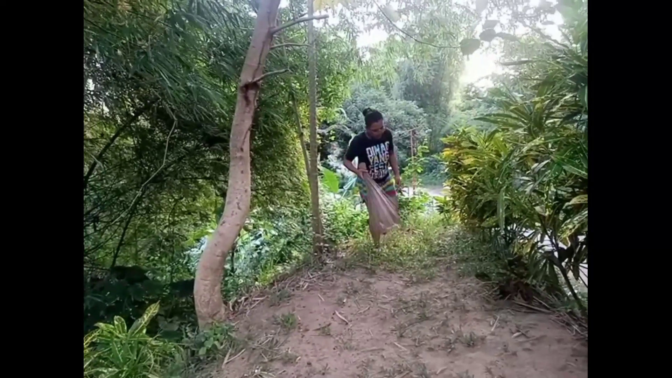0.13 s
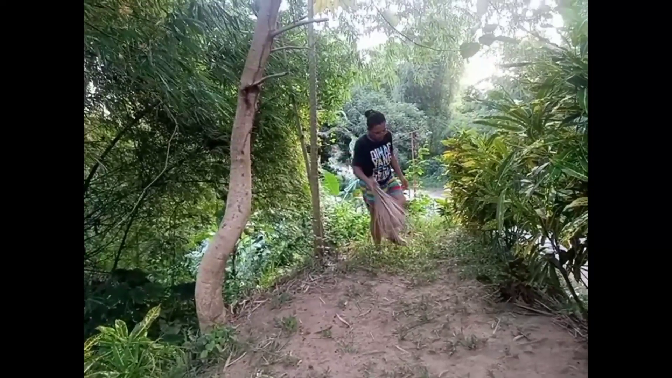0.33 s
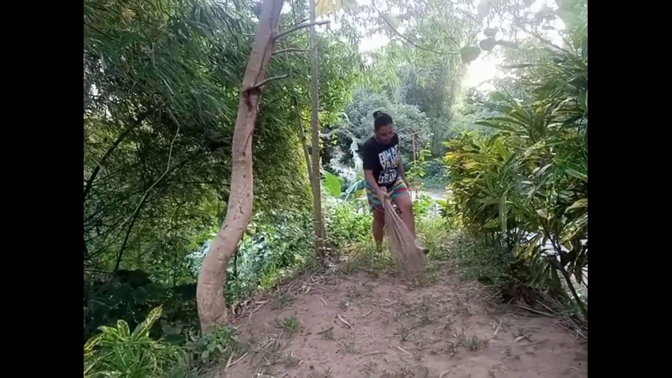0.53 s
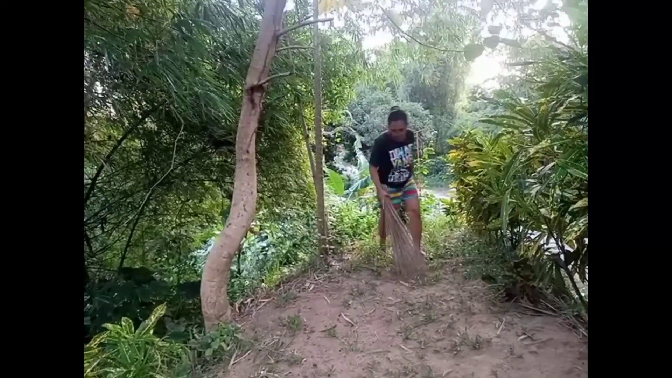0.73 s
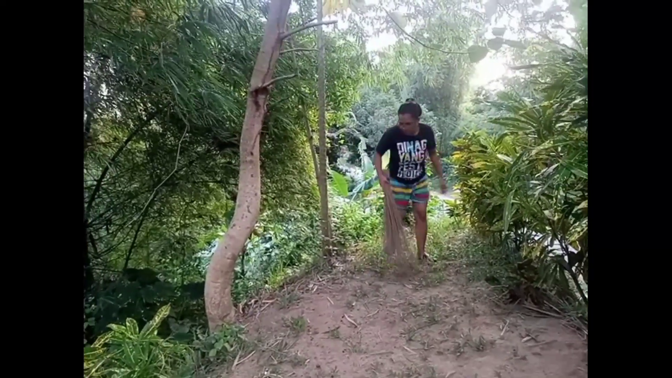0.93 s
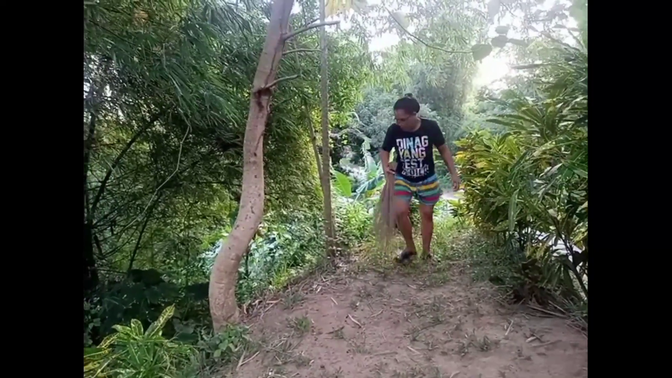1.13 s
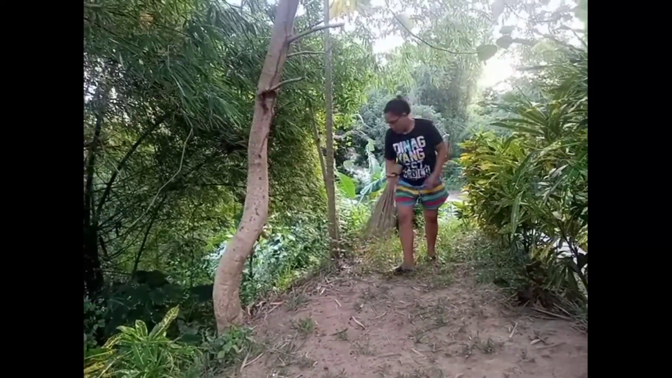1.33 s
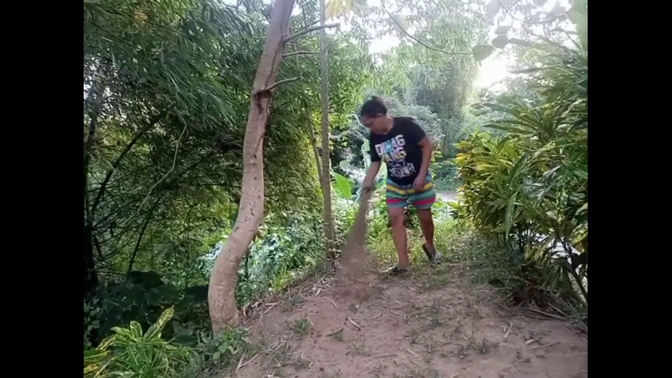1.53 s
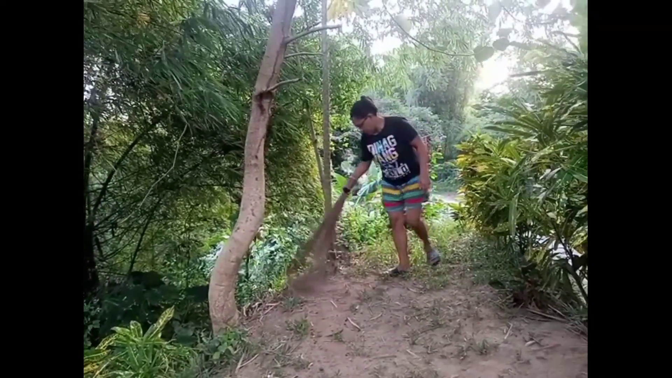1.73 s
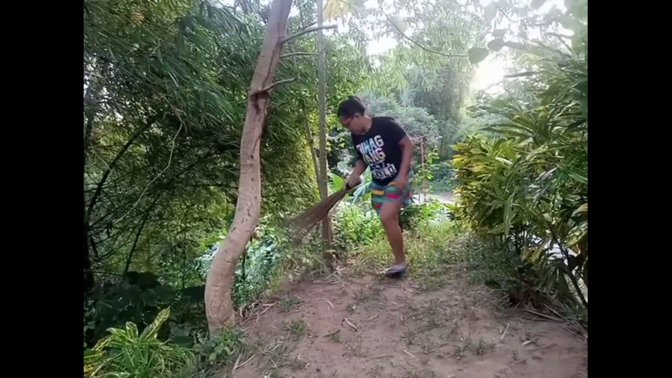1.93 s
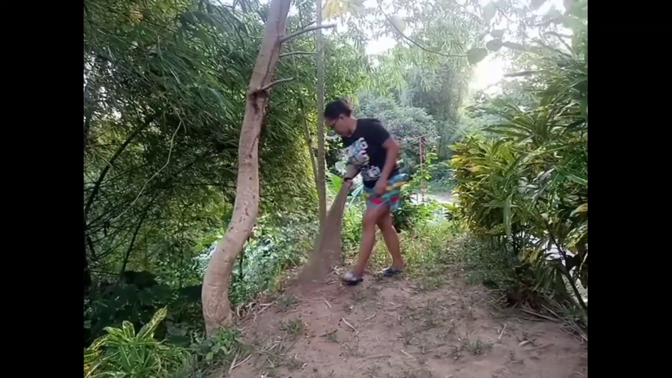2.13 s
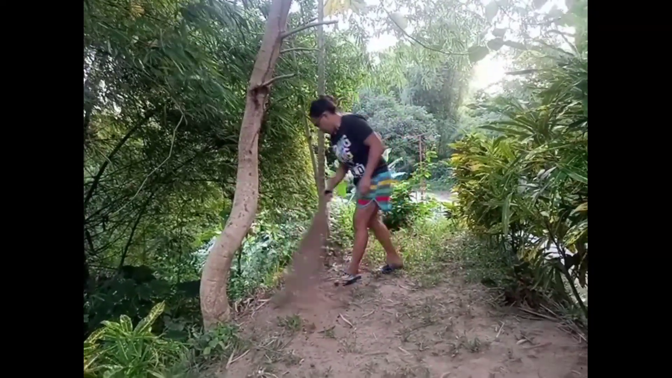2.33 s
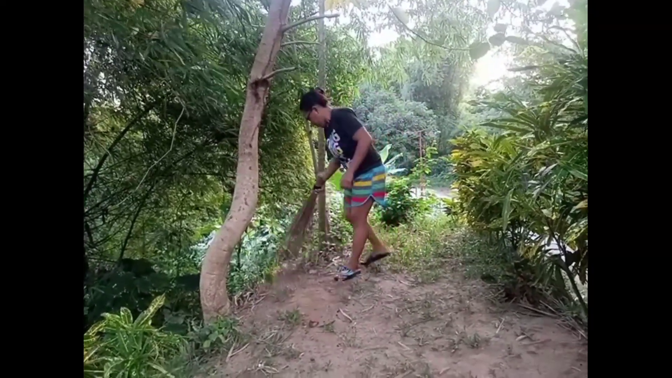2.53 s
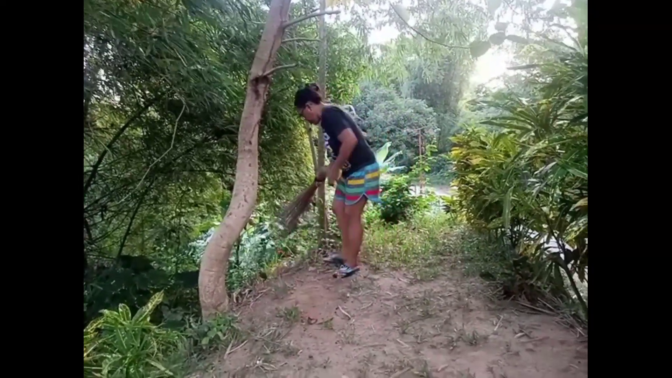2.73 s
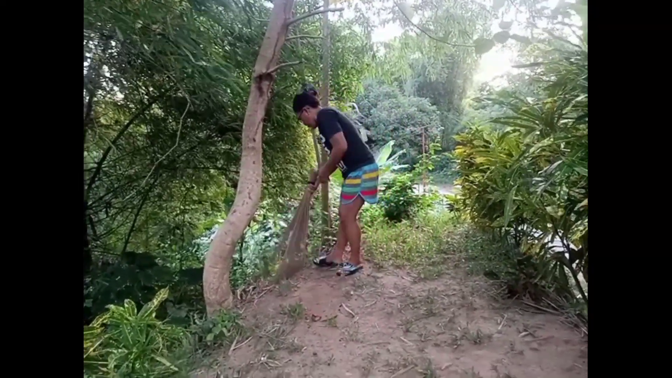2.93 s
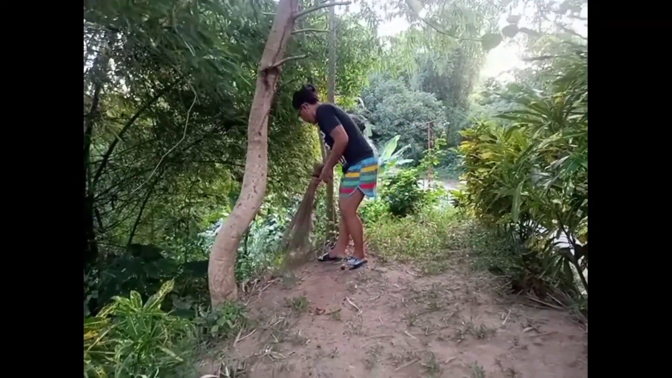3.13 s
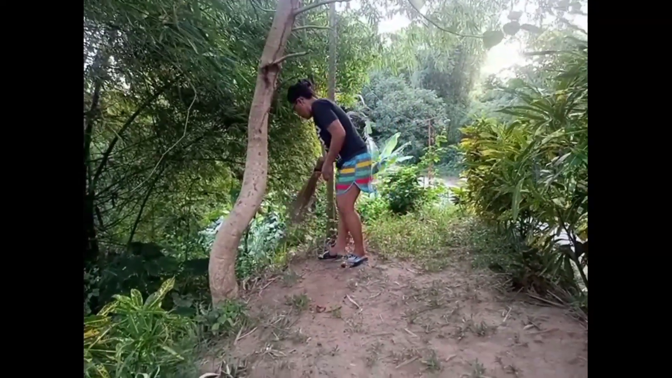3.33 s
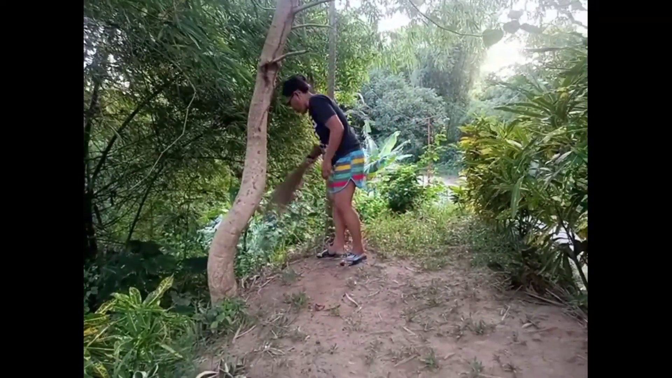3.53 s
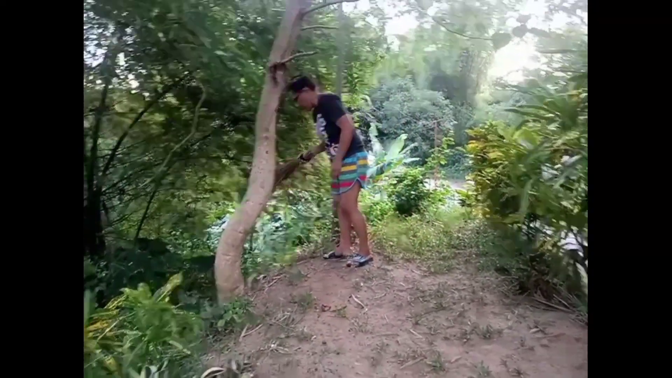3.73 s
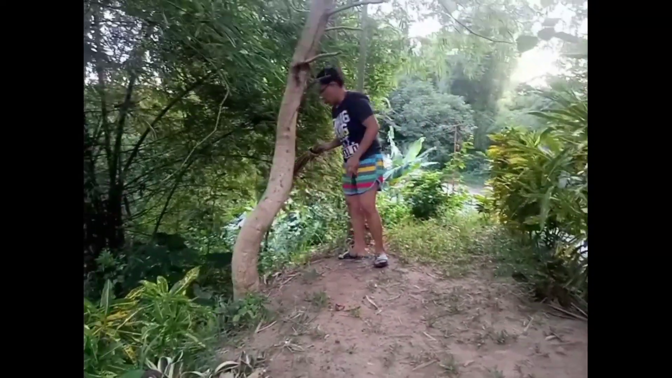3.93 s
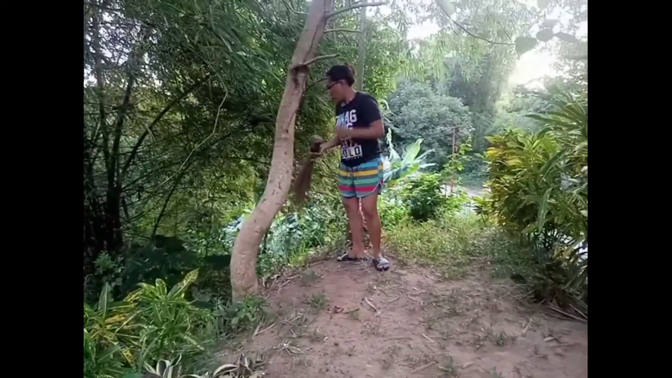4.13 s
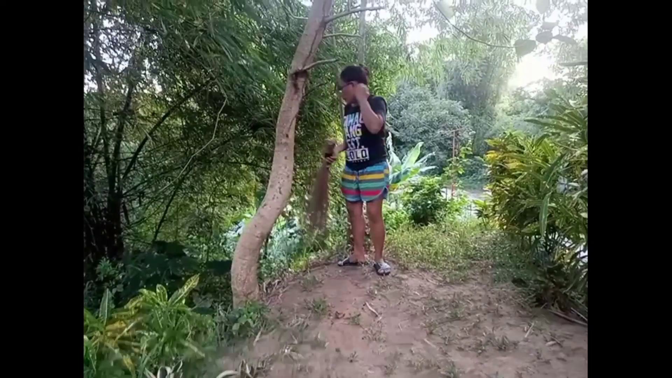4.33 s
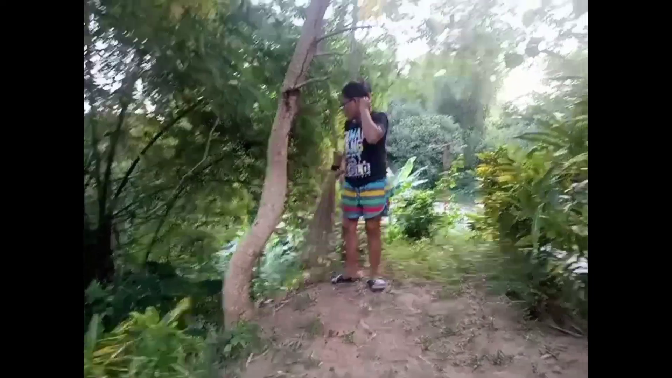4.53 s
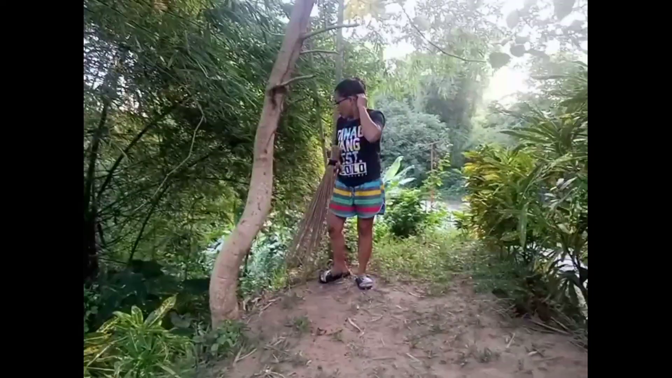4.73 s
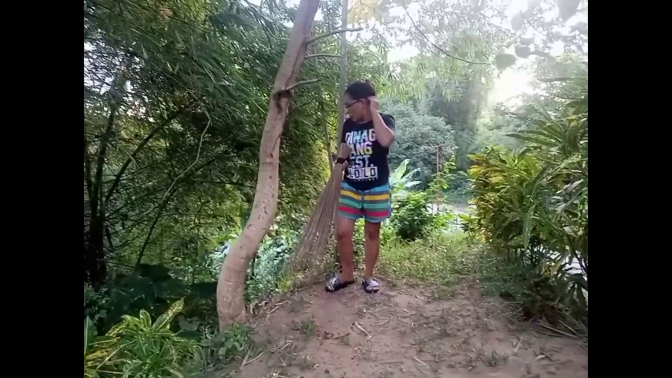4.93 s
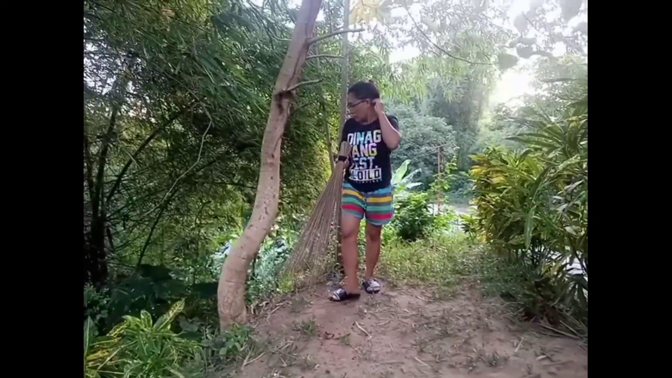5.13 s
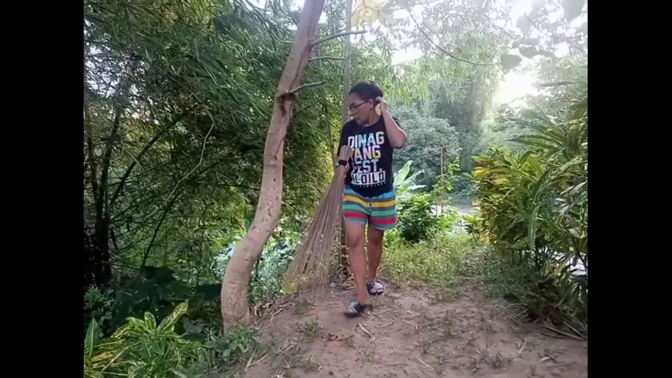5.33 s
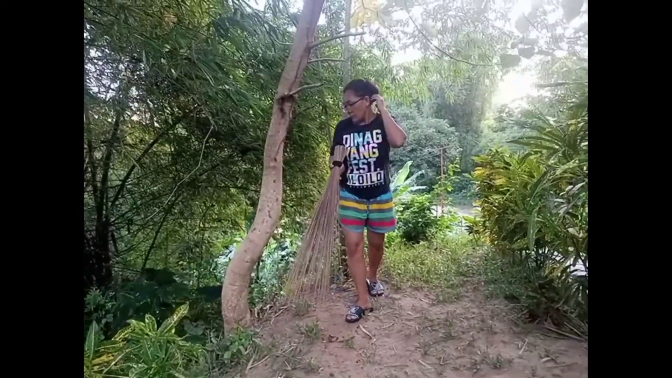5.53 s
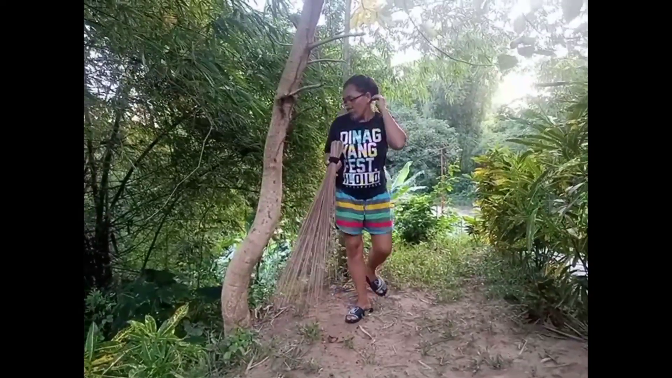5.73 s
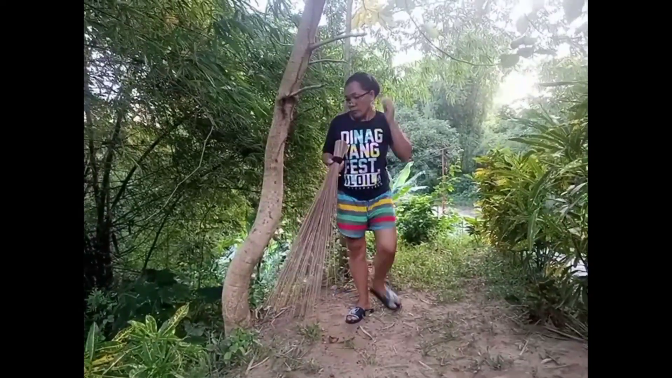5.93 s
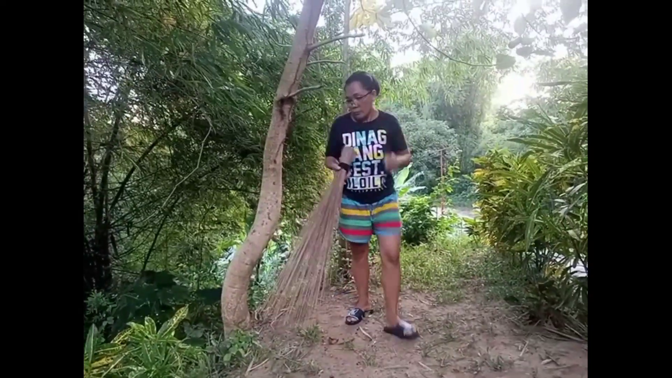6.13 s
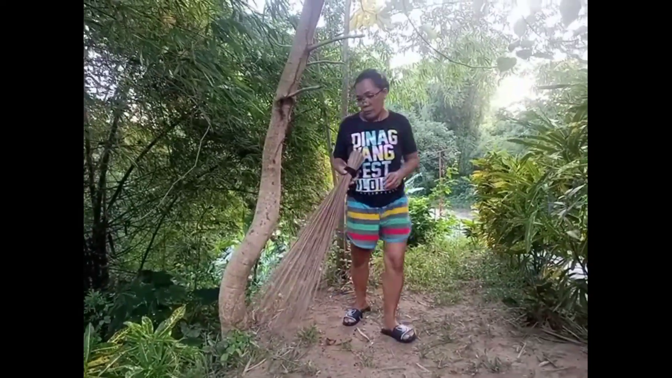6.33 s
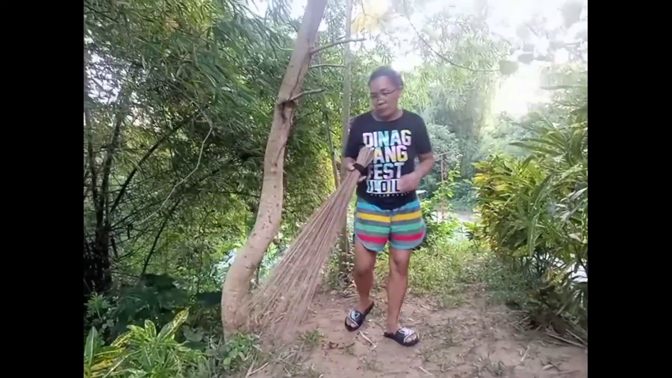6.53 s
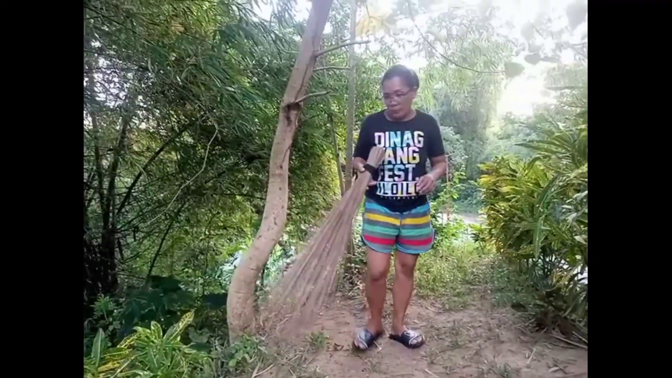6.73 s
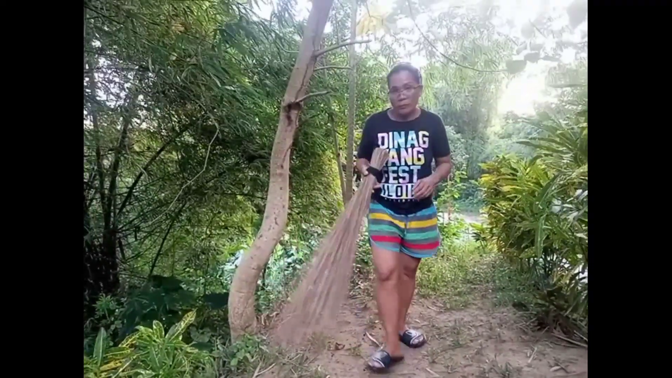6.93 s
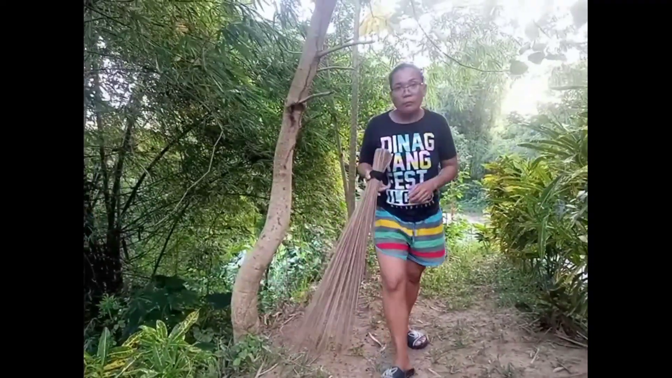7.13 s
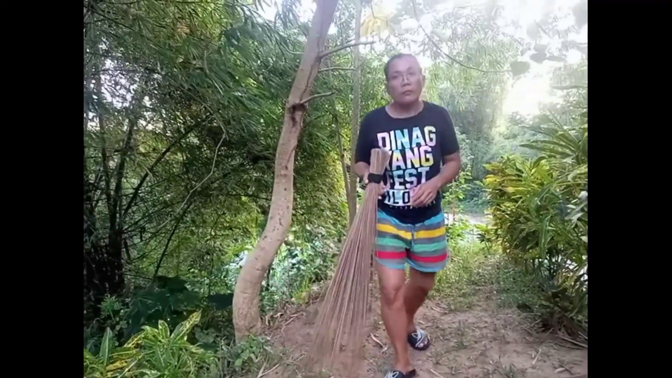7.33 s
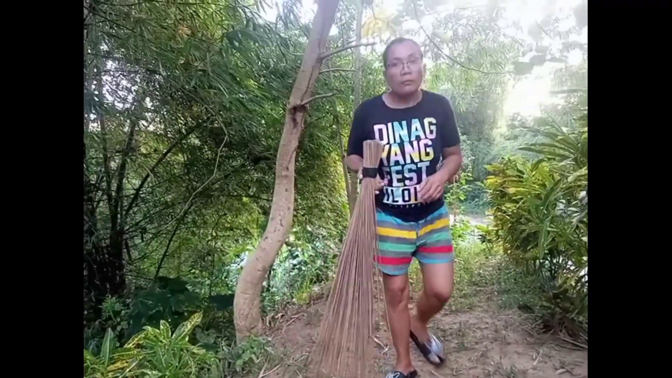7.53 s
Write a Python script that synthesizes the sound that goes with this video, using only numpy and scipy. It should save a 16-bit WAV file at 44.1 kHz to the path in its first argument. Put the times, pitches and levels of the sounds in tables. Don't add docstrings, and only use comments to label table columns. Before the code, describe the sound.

Scratchy broom strokes drive grit and twigs along packed earth, with a heel thud between, then faint leafy dragging amid crickets and distant rumble.

```python
import sys
import numpy as np
from scipy import signal
from scipy.fft import rfft, irfft, next_fast_len
from scipy.io import wavfile
from scipy.ndimage import uniform_filter1d

SR = 44100
rng = np.random.default_rng(int(sys.argv[2]) if len(sys.argv) > 2 else 0)


def rack_gain(trim_db):
    fader = np.asarray(trim_db, float)
    return 10 ** (fader / 20)


def int16_out(signal):
    q = np.round(np.clip(np.atleast_2d(signal).T, -1, 1) * 32767)
    wavfile.write(sys.argv[1], SR, q.astype(np.int16))


N = 338511

# time in seconds, drone level in dB.
ENGINE_DRONE = [(0, -39), (.9, -38.5), (1.55, -33.5), (2.1, -36), (2.7, -42), (3.1, -39), (3.8, -36),
                (4.5, -33), (5.2, -34.5), (5.9, -37), (6.8, -40), (7.68, -36.5)]
# time in seconds, firing rate in Hz.
ENGINE_FIRING = [(0, 41.08), (1, 41), (1.8, 40.46), (2.3, 40.25), (3.5, 40.06), (4.1, 39.04), (4.5, 39.1),
                 (4.9, 40.64), (5.3, 41.15), (5.9, 41.69), (7.68, 41.5)]
# multiple, level in dB.
ENGINE_ORDERS = [(2, -14.5), (3, -9), (4, -13), (5, -4), (6, 2.5), (7, 2), (8, -8), (9, -13), (10, -14),
                 (11, -14), (12, -20)]
# frequency in Hz, density in dB per Hz.
RUMBLE_COLOUR = [(15, -47), (25, -1), (27, -21), (32, -20.5), (128, 12), (281, 3.5), (348, -4), (454, -10),
                 (539, -18), (600, -47), (780, -76), (1320, -120)]
# time in seconds, level in dB.
TYRE_WASH = [(0, -55.5), (1, -48.5), (1.6, -49), (2.7, -52), (3.1, -60.5), (4.5, -53.5), (6.7, -60),
             (7.1, -45.5), (7.68, -53.5)]
# time in seconds, length in seconds, deep rumble in dB.
WIND_BUFFETS = [
    (1.15, 0.26, -45.5),
    (2.115, 0.071, -38),
    (2.443, 0.14, -48.5),
    (3.594, 0.061, -45),
    (4.564, 0.041, -42),
    (5.296, 0.047, -41),
    (5.708, 0.24, -46),
    (6.395, 0.47, -46.5),
    (7.0, 0.23, -45),
    (7.55, 0.069, -45.5),
]
# frequency in Hz, density in dB per Hz.
GARDEN_COLOUR = [(290, -46), (500, -12), (716, -16), (1150, -15), (1570, -26.5), (2420, -8), (3180, -4.5),
                 (4820, -13.5), (5640, -0.5), (7200, -3), (8080, -20.5), (10500, -20), (12200, -24),
                 (14100, 8.5), (15400, -27)]
# time in seconds, level in dB.
CRICKET_SWELL = [(4.2, -33), (4.4, -40), (5.5, -34.5), (5.7, -35), (7.3, -31), (7.68, -36)]
# start in seconds, end in seconds, level in dB.
KATYDID_RASPS = [
    (0.294, 0.44, -45),
    (0.573, 0.72, -44),
    (5.55, 5.661, -43),
    (5.82, 5.995, -43),
    (6.15, 6.303, -41),
    (6.515, 6.64, -39),
]
# start in seconds, end in seconds, notes per second, bottom in Hz,
# level in dB.
BIRD_TRILLS = [(0.293, 0.43, 42, 5660, -33), (0.59, 0.708, 45, 5680, -28), (1.54, 1.624, 85, 6030, -31),
               (3.972, 4.06, 48, 5960, -30), (4.208, 4.275, 41, 5880, -30.5),
               (4.862, 4.922, 50, 6500, -28.5), (5.053, 5.152, 60, 6400, -28),
               (5.325, 5.435, 40, 5800, -30.5), (6.475, 6.612, 52, 5870, -29.5),
               (6.685, 6.788, 80, 6250, -29), (6.91, 7.036, 89, 6250, -30), (7.377, 7.443, 69, 6090, -42),
               (7.594, 7.682, 61, 6300, -37)]
# time in seconds, peak in dB, pitch in Hz, cycles rung.
HEEL_THUDS = [
    (2.105, -19, 213, 5.4),
    (2.121, -6.5, 255, 5),
    (2.135, -5.5, 287, 15),
    (2.15, -9, 248, 2.8),
    (7.519, -16, 186.7, 4.7),
    (7.538, -19, 186, 7.4),
    (7.553, -36, 300.6, 6.3),
    (7.563, -17, 187, 4.8),
]
# time in seconds, peak in dB, pitch in Hz, cycles rung.
PEBBLES = [(1.661, -31, 1290, 4.0), (1.676, -18, 1140, 4.0), (1.7, -28, 1360, 4.0), (1.712, -20, 972, 4.0),
           (1.721, -16, 1030, 4.0), (1.737, -28, 703, 4.0), (1.749, -31, 1120, 4.0),
           (1.785, -34, 1450, 4.0), (1.799, -35, 1120, 4.0), (1.815, -28, 1350, 4.0),
           (1.871, -32, 1080, 4.0), (1.893, -34, 1350, 4.0), (1.919, -32, 1100, 4.0),
           (1.939, -33, 1450, 4.0), (2.031, -36, 1130, 4.0), (2.195, -23, 840, 3.4),
           (2.213, -20, 1170, 4.0), (2.249, -19, 1170, 4.0), (2.473, -37, 1300, 4.0),
           (2.511, -34, 1470, 4.0), (2.572, -27, 1500, 4.0), (2.609, -31, 1440, 4.0),
           (2.642, -32, 816, 4.0), (2.66, -25, 856, 4.0), (2.68, -20, 1470, 4.0), (2.731, -17.5, 977, 4.0),
           (2.743, -17, 1080, 4.0), (2.872, -30, 1130, 4.4), (3.26, -35, 1430, 4.0), (3.299, -35, 937, 4.0),
           (3.329, -37, 842, 4.0)]
# time in seconds, peak in dB, pitch in Hz, cycles rung, crack in dB.
TWIGS = [(0.755, -38, 1740, 3.5, -20), (1.722, -24, 1700, 4, -19.5), (1.746, -24, 2200, 4, -20),
         (1.804, -23, 1900, 4, -20), (1.881, -20, 2300, 4, -20), (2.195, -23, 2100, 4, -22),
         (2.2365, -9.5, 1700, 9, -18), (2.228, -25, 1200, 4, -20), (2.243, -14, 1300, 4.4, -24),
         (2.303, -29, 1290, 1.9, -20), (2.5948, -8, 1750, 8.3, -16), (2.626, -19, 2300, 4, -20),
         (2.681, -15, 1900, 3.5, -22), (2.699, -24, 2000, 4, -20), (2.72, -18, 1700, 4, -20),
         (2.727, -14, 2050, 4, -20), (2.745, -13, 1900, 4, -20), (3.073, -18.5, 970, 24, -18),
         (3.0735, -15, 1400, 6.5, -18)]
# time in seconds, peak in dB, pitch in Hz, cycles rung, crack in dB.
TWIG_BREAK = [
    (2.3036, 4, 14300, 40, -12),
    (2.3035, -14, 5500, 3, -30),
    (2.3033, -13, 1400, 1.5, -40),
]
# time in seconds, peak in dB, pitch in Hz, cycles rung,
# crack in dB.
STALK_TICKS = [(2.2165, -5, 2930, 14, -17), (4.794, -18, 3910, 10, -17), (5.09, -25, 2300, 4, -20),
               (5.5, -19, 3100, 6, -18), (5.528, -25, 3300, 6, -18), (6.2514, -7, 3300, 4.6, -24),
               (6.2568, -14, 2300, 6, -26), (6.2597, -6, 3100, 4.8, -24), (6.2652, -21, 2300, 8, -26),
               (6.2664, -15, 3300, 5, -26), (6.268, -5, 2730, 10, -24), (6.2738, -11, 3800, 5.7, -20),
               (6.2756, -18, 3000, 4, -20), (7.1347, -18, 3620, 10, -20), (7.5547, -14, 3750, 9, -20)]
# time in seconds, peak in dB, pitch in Hz, cycles rung, crack in dB.
TIP_SNAPS = [
    (0.6564, -23, 13700, 12, -9),
    (0.6804, -11, 14000, 12, -15),
    (1.2804, -13, 14740, 12, -11),
    (1.2944, -19, 14800, 12, -8),
    (1.3254, -10, 14300, 12, -8),
    (5.7174, -11, 14300, 12, -17),
    (7.1365, -18, 14100, 11.4, -4),
    (7.203, -22, 14500, 12, -9),
    (7.212, -11.5, 14500, 12.4, -4),
]
# time in seconds, peak in dB, pitch in Hz.
STALK_PLUCKS = [(1.6916, -17, 3100), (1.716, -12, 2980), (1.7794, -13, 2940), (1.805, -14, 3000),
                (1.867, -13, 3110), (1.8841, -11, 3220), (2.1964, -13, 2970), (2.4478, -18, 3100),
                (2.5212, -14, 2900), (2.5451, -11, 3040), (2.5956, -10, 2870), (2.6054, -14, 3090),
                (2.616, -15, 3020), (2.6507, -9, 3110), (2.6704, -17, 2910), (2.6914, -20, 2970),
                (2.706, -14, 3120), (2.7132, -12, 2960), (2.731, -16, 2980), (2.7462, -12, 2960),
                (3.0766, -20, 3050), (3.1882, -10, 3300), (3.2051, -17, 2810), (3.2654, -1, 3110),
                (3.3047, -4, 3000), (3.325, -6, 2880)]
# bottom in Hz, top in Hz.
BROOM_ZONES = [(550, 2200), (2750, 5200), (7800, 10800), (12500, 15500)]
# frequency in Hz, density in dB per Hz.
BROOM_COLOUR = [(260, -57), (450, -46), (1160, -29), (1860, -19.5), (2300, -15), (2800, -10.5), (3310, -9),
                (4320, -9), (5470, -9.5), (5980, -7.5), (7140, -11), (9180, -7), (11300, -13), (13900, 2),
                (15400, -15.5)]
# start in seconds, end in seconds, pitch in Hz,
# level in dB over the scratch.
STALK_BUNDLES = [(0.51, 0.585, 4100, -6), (0.49, 0.62, 4520, -1.5), (.757, .78, 3770, -8),
                 (.72, .77, 4300, -6), (1.162, 1.208, 9400, 7.5), (1.165, 1.2, 8600, 2),
                 (1.9, 1.967, 3180, -13.5), (1.7, 1.9, 3630, -20), (1.72, 1.964, 4400, -11),
                 (1.6, 1.95, 5800, -23), (1.77, 1.78, 11000, -16), (2.443, 2.76, 3160, -14),
                 (2.45, 2.62, 4000, -30), (2.44, 2.69, 4640, -14), (2.5, 2.693, 6060, -17),
                 (2.44, 2.7, 10000, -11), (3.0, 3.1, 3110, -17.5), (3.198, 3.35, 3090, -8.5),
                 (3.4, 3.54, 3040, -13), (3.262, 3.38, 4700, -13), (3.2, 3.38, 4900, -19),
                 (3.38, 3.55, 4800, -28), (3.4, 3.55, 5790, -19), (3.903, 3.935, 5200, 2.5),
                 (4.49, 4.78, 3550, -9.5), (4.74, 4.82, 4920, -7), (4.52, 4.65, 4400, -9),
                 (5.04, 5.135, 3400, -6.5), (5.49, 5.6, 3600, -9), (2.05, 2.2, 4480, -12),
                 (0.716, 0.76, 9550, -1)]
# full from in seconds, full to in seconds,
# stalk scratch in dB, extra treble in dB, ground scrape in dB under the scratch.
PUSHES = [(0.484, 0.71, -44, -26, -10.5), (0.704, 0.715, -39, 6, -25), (0.73, 0.765, -27, 2, -19),
          (1.628, 1.655, -30, 3, -25), (1.657, 1.66, -21, 4.5, -21), (1.681, 1.718, -19, 7.5, -19),
          (1.729, 1.793, -15.5, 0.5, -20), (1.807, 1.84, -14, 1.5, -18), (1.872, 1.906, -15.5, -0.5, -25),
          (1.922, 1.95, -21, -1, -24), (2.01, 2.138, -31, -12, -8.5), (2.173, 2.24, -25, 1, -13),
          (2.257, 2.286, -30.5, 5.5, -8), (2.336, 2.405, -41, 7, -4), (2.433, 2.44, -23.5, 3, -20),
          (2.451, 2.472, -20, 2.5, -18.5), (2.495, 2.575, -18, 2, -20), (2.599, 2.675, -15.5, 2, -21.5),
          (2.702, 2.72, -28.5, 7.5, -26), (2.724, 2.747, -21.5, 5.5, -18.5), (2.79, 2.816, -29, 3, -19),
          (2.856, 2.898, -43.5, -5, 1), (3.012, 3.085, -28, 6, -15.5), (3.067, 3.097, -27.5, -4, -14),
          (3.189, 3.252, -18.5, -0.5, -22), (3.271, 3.344, -16, -0.5, -43), (3.357, 3.363, -24, 5, -26),
          (3.4, 3.497, -24, 1.5, -48), (3.887, 3.885, -32, 8, -48), (4.79, 4.84, -35, 0, -40),
          (5.504, 5.5, -34, -7, -23), (6.238, 6.262, -31.5, -8, -13), (7.097, 7.118, -40.5, -4, -11),
          (7.201, 7.185, -32, 2, -13), (7.56, 7.537, -55, -12, -9)]
# time in seconds, scratch in dB.
RESTING = [(0, -47), (.62, -72), (.7, -38), (.85, -35.5), (1.05, -30.5), (1.3, -37), (1.5, -41),
           (1.62, -38), (2.0, -24.5), (2.4, -33.5), (2.95, -30), (3.6, -30), (3.85, -31.5), (4.27, -40),
           (4.5, -34), (4.78, -30.5), (5.15, -45.5), (7.68, -49)]
# ground, scratch, grit and dust in dB.
RESTING_COLOUR = [-16.5, 0.5, -3, 5.5]
# time in seconds, scratch in dB.
TRAILING = [(0, -46.5), (.6, -46), (1.4, -39), (4.2, -69), (5, -40.5), (6.1, -39.5), (7.68, -37.5)]
# ground, scratch, grit and dust in dB.
TRAILING_COLOUR = [-11, 0.5, -23, 11.5]
# frequency in Hz, gain in dB.
TREBLE_TRIM = [(11000, -1), (12300, -9.5), (13200, -4.5), (14100, -2.5), (14900, 7.5), (15500, 5)]
# time in seconds, value at full scale 1.
CONVERTER_DRIFT = [(0, -.0048), (1.2, -.0068), (2.7, -.0043), (7.68, -.011)]

FRAME = 1024


def unit(x):
    return x / np.sqrt(np.mean(x ** 2) + 1e-20)


def in_time(rows):
    s, *columns = np.transpose(rows)
    return [np.interp(np.arange(N) / SR, s, column) for column in columns]


def drift(rate):
    r = np.exp(-64 * np.pi * rate / SR)
    slow = signal.lfilter([1], [1, -2 * r, r * r], rng.standard_normal(N // 32 + 3002))[3000:]
    return np.interp(np.arange(N) / 32, np.arange(len(slow)), unit(slow - slow.mean()))


def ring(x, hz, t60):
    r, w = rack_gain(-60 / (t60 * SR)), 2 * np.pi * hz / SR
    return signal.lfilter([0, np.sin(w)], [1, -2 * r * np.cos(w), r * r], x + 1e-18)


def power_sum(layers_db):
    return 10 * np.log10(sum(rack_gain(db) ** 2 for db in layers_db))


def played(source, spectrum, zones, levels_db, count, patchy_db, rate):
    size = next_fast_len(N)
    log_hz = np.log(np.arange(size // 2 + 1) * SR / size + 1e-3)
    table = np.array(spectrum)
    tones = rfft(source, size) * rack_gain(np.interp(log_hz, np.log(table[:, 0]), table[:, 1]))
    zone_db = []
    for low, high in zones:
        inside = tones[int(low * size / SR):int(high * size / SR)]
        zone_db.append(10 * np.log10(2 * np.sum(abs(inside) ** 2) / size / N))
    lifts = np.array(levels_db) - np.array(zone_db)[:, None]
    centres = np.linspace(np.log(zones[0][0]), np.log(zones[-1][1]), count)
    edges = np.log(zones).ravel()
    out = np.zeros(N)
    for k, centre in enumerate(centres):
        band = irfft(tones * np.interp(log_hz, centres, np.arange(count) == k), size)[:N]
        weights = [np.interp(centre, edges, np.repeat(row, 2)) for row in np.eye(len(zones))]
        out += band * rack_gain(weights @ lifts + patchy_db * drift(rate))
    return out


def engine_and_road():
    t = np.arange(N) / SR
    drone_db, wash_db = in_time(ENGINE_DRONE)[0], in_time(TYRE_WASH)[0]
    clean_db = 4.5 - 1.47 * t
    buffets_db = [np.maximum(db - 4.0 * ((t - s) / length) ** 2, -99) for s, length, db in WIND_BUFFETS]
    deep_db = power_sum([wash_db - 1.5] + buffets_db)
    firing_hz = in_time(ENGINE_FIRING)[0] * (1 + 0.0031 * drift(9.0))
    turn = 2 * np.pi * np.cumsum(firing_hz) / SR
    orders = np.zeros(N)
    for multiple, db in ENGINE_ORDERS:
        fading = rack_gain(db + 1.4 * drift(1.3))
        orders += fading * np.sin(round(multiple) * turn + 0.36 * drift(5.6))
    zones = [(60, 110), (200, 370), (420, 600)]
    rumble = played(rng.standard_normal(N), RUMBLE_COLOUR, zones, [deep_db, drone_db + 0.5, wash_db],
                    count=7, patchy_db=3.5, rate=5.5)
    return rumble * (1 + 0.19 * np.cos(turn)) + unit(orders) * rack_gain(drone_db + clean_db)


def garden():
    chorus = played(rng.standard_normal(N), GARDEN_COLOUR, [(600, 23400)], [np.full(N, -33)],
                    count=10, patchy_db=-1.0, rate=3.7)
    crickets = unit(ring(rng.standard_normal(N), 5620, 0.0049)) * rack_gain(in_time(CRICKET_SWELL)[0] - 4.0)
    return chorus + crickets * np.clip(np.arange(N) / SR - 3.6, 0, 1)


def katydid():
    t = np.arange(N) / SR
    gate = sum(rack_gain(db) * np.clip(np.minimum(t - a, b - t) / 0.011, 0, 1) for a, b, db in KATYDID_RASPS)
    strokes = np.sin(np.pi * 125 * t) ** 4 * rng.standard_normal(N)
    return gate * unit(ring(ring(strokes, 11500, 0.0021), 11500, 0.0021))


def bird():
    top_hz = 7510
    out, scattered, t = np.zeros(N), np.zeros(N), np.arange(N) / SR
    hoarse = rack_gain(1.5 * drift(200))
    chances = rng.standard_normal((len(BIRD_TRILLS), 16))
    for (start, end, per_s, low_hz, db), wobble in zip(BIRD_TRILLS, chances):
        span = slice(round(start * SR), round(end * SR))
        beat = (t[span] - start) * per_s
        note = beat.astype(int)
        place = np.minimum(beat % 1 / 0.89, 1)
        hz = top_hz + (low_hz - top_hz) * place + 120 * wobble[note]
        swell = np.sin(np.pi * place ** 0.85) * rack_gain(db + 0.37 * wobble[-1 - note])
        notes = swell * np.sin(2 * np.pi * np.cumsum(hz) / SR) * hoarse[span]
        out[span] += notes
        scattered[span] += notes * rack_gain(-4 + 1.24 * start)
    leaves = rng.standard_normal(5000) * np.exp(-np.arange(5000) / SR / .02)
    return out + signal.fftconvolve(scattered, leaves / np.sqrt(np.sum(leaves ** 2)))[:N]


def knocks(events, softness, floor_hz):
    out, span = np.zeros(N + 4096), np.arange(4096)
    noises = rng.standard_normal((len(events), 4096))
    for (s, db, hz, cycles, *crack_db), noise in zip(events, noises):
        contact = np.sin(np.pi * np.minimum(span * hz / SR / softness, 1)) + (span == 0)
        body = ring(contact, hz, max(cycles, 1) / hz)
        crack_gain = sum(rack_gain(c) for c in crack_db)
        crack = crack_gain * np.diff(noise, prepend=0) * np.exp(-span / SR / .0018)
        out[round(s * SR):][:4096] += rack_gain(db) * (body / abs(body).max() + crack)
    high_pass = signal.butter(4, floor_hz, "high", fs=SR, output="sos")
    return signal.sosfilt(high_pass, out[:N] + 1e-18)


def path_knocks():
    pebbles = knocks(PEBBLES, softness=0.4, floor_hz=500)
    thuds = knocks(HEEL_THUDS, softness=0.27, floor_hz=89)
    return knocks(TWIGS, softness=0.34, floor_hz=770) + pebbles + thuds


def stalk_snaps():
    plucks = [(s, db - 1, hz, 41, -22) for s, db, hz in STALK_PLUCKS]
    out = knocks(STALK_TICKS, softness=0.13, floor_hz=1800)
    out += knocks(TIP_SNAPS, softness=.1, floor_hz=3000)
    out += knocks(TWIG_BREAK, softness=.1, floor_hz=500)
    return out + knocks(plucks, softness=0.44, floor_hz=2000)


def broom_levels():
    rise_db_per_s, fall_db_per_s = 645, 186
    let_go = np.c_[[0.88, 1, 1, 1]]
    t = np.arange(0, N + 64, 64) / SR
    layers = []
    for curve, colour in [(RESTING, RESTING_COLOUR), (TRAILING, TRAILING_COLOUR)]:
        layers.append(np.interp(t, *np.transpose(curve)) + np.c_[colour])
    for start, end, db, treble_db, ground_db in PUSHES:
        easing_db = fall_db_per_s * (t - end) * let_go
        loss_db = np.maximum(0, np.maximum(rise_db_per_s * (start - t), easing_db))
        colour = [2.5 + ground_db, 0, -4 + treble_db, 5.5 + treble_db]
        layers.append(db - loss_db + np.c_[colour])
    return [np.interp(np.arange(N) / SR, t, row) for row in power_sum(layers)]


def broom():
    sizes = rack_gain(2.6 * np.minimum(rng.exponential(1, N), 5)) * rng.choice([-1, 1], N)
    slips = sizes * (rng.random(N) < 4000 * rack_gain(3.0 * drift(40)) / SR)
    grit = unit(slips) * rack_gain(-1) + rng.standard_normal(N)
    pebbles = sizes * (rng.random(N) < 150 / SR)
    dull = signal.butter(2, 1600, fs=SR, output="sos")
    grit += unit(signal.sosfilt(dull, pebbles + 1e-18)) * rack_gain(-33)
    grit = grit * rack_gain(0.1 * drift(99) + 0.27 * drift(4.4))
    levels_db = broom_levels()
    out = played(grit, BROOM_COLOUR, BROOM_ZONES, levels_db, count=18, patchy_db=-1.1, rate=8.9)
    for start, end, hz, db in STALK_BUNDLES:
        span = slice(round(start * SR), round(end * SR))
        swell = np.sin(np.linspace(0, np.pi, span.stop - span.start)) ** .3
        out[span] += unit(ring(grit[span], hz, .012)) * swell * rack_gain(levels_db[1][span] + db)
    return out


def ducking(loud):
    keep = np.exp(-1 / (0.29 * SR))
    level_db = 10 * np.log10(signal.lfilter([1 - keep], [1, -keep], loud ** 2) + 1e-12)
    return rack_gain(-0.15 * np.maximum(level_db + 20, 0))


def scene():
    sweep = broom()
    background = engine_and_road() + garden() * ducking(sweep) + katydid() + bird()
    return (background + path_knocks() + stalk_snaps() + sweep)[None]


def suppress(x, spread_db, size, count):
    hz, _, cells = signal.stft(x, SR, nperseg=FRAME)
    chance = uniform_filter1d(rng.standard_normal(cells.shape), size, axis=-2)
    chance = uniform_filter1d(chance, count, axis=-1)
    reach = np.interp(hz, [350, 800, 5000, 11000, 13500], [0, 1.2, 1, .9, .2])[:, None]
    loudness_db = 10 * np.log10(np.mean(abs(cells) ** 2, axis=-2, keepdims=True) + 1e-12)
    reach = reach * np.interp(loudness_db - np.median(loudness_db), [3, 14], [1, .3])
    trim_db = np.interp(hz, *np.transpose(TREBLE_TRIM))[:, None]
    gain = rack_gain(spread_db * unit(chance) * reach + trim_db) * (hz < 15560)[:, None]
    return signal.istft(cells * gain, SR, nperseg=FRAME)[1][:, :N]


def treble_dips(x):
    shifted = np.arange(N) + FRAME // 2
    joint = np.exp(-(shifted % FRAME - FRAME // 2) ** 2 / (2 * 60 ** 2))
    depth = np.clip(.52 + .17 * rng.standard_normal(N // FRAME + 2), 0, 1)[shifted // FRAME]
    high_pass = signal.butter(2, 8500, "high", fs=SR, output="sos")
    return x - signal.sosfiltfilt(high_pass, x) * joint * depth


def low_pass(x):
    return signal.sosfilt(signal.butter(12, 16700, fs=SR, output="sos"), x)


def record(dry):
    x = suppress(dry * 0.75, spread_db=2.0, size=4, count=5)
    x = treble_dips(x) + in_time(CONVERTER_DRIFT)[0]
    return low_pass(np.clip(x, -.93, .93))


dry = scene()
out = record(dry)
int16_out(out)
```